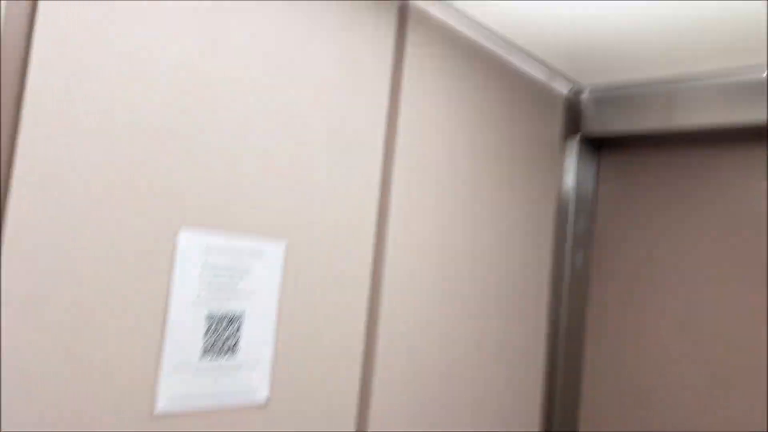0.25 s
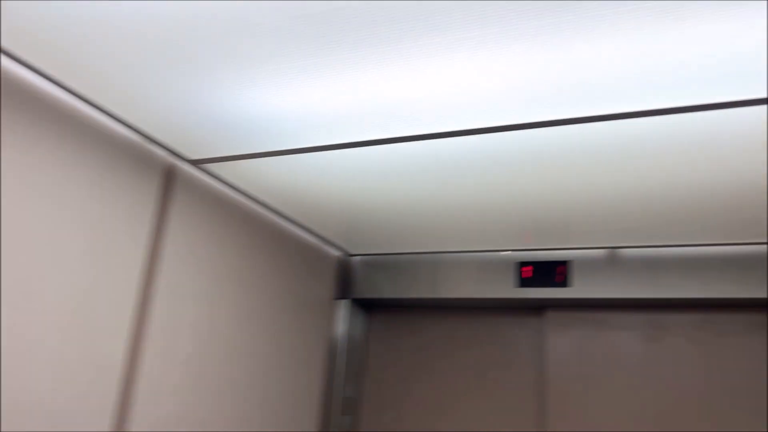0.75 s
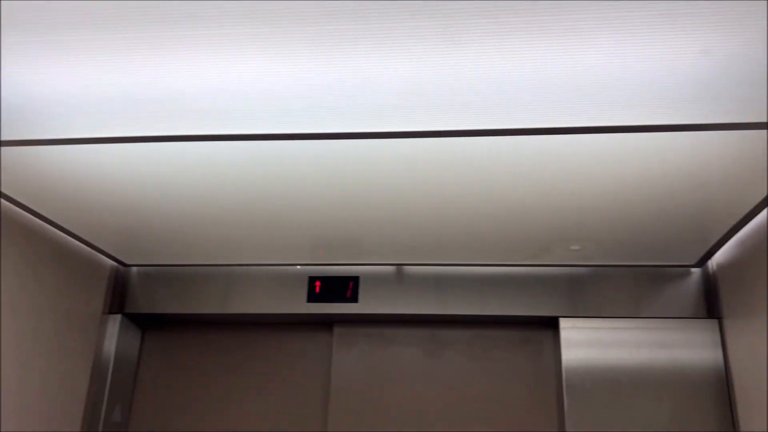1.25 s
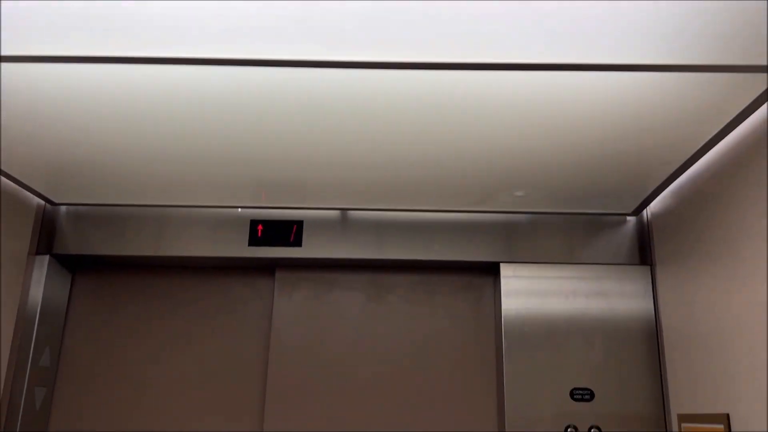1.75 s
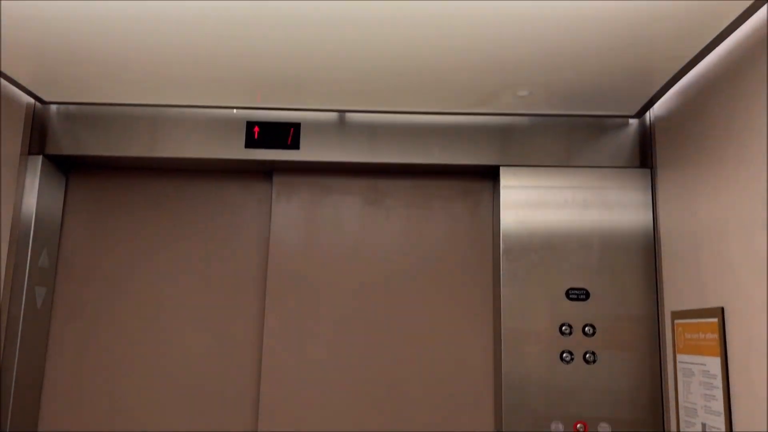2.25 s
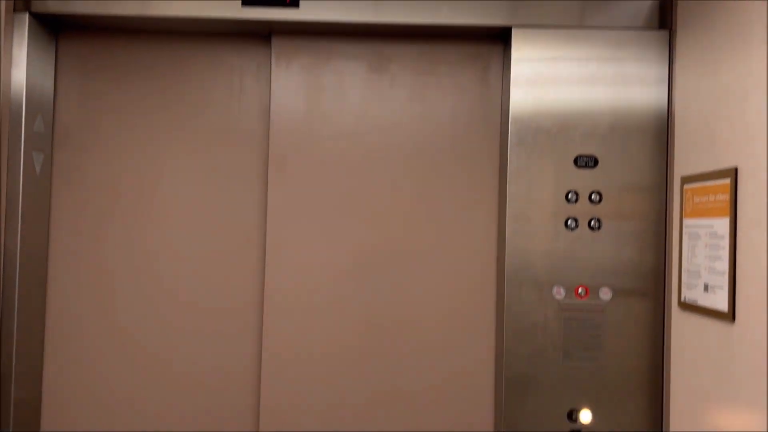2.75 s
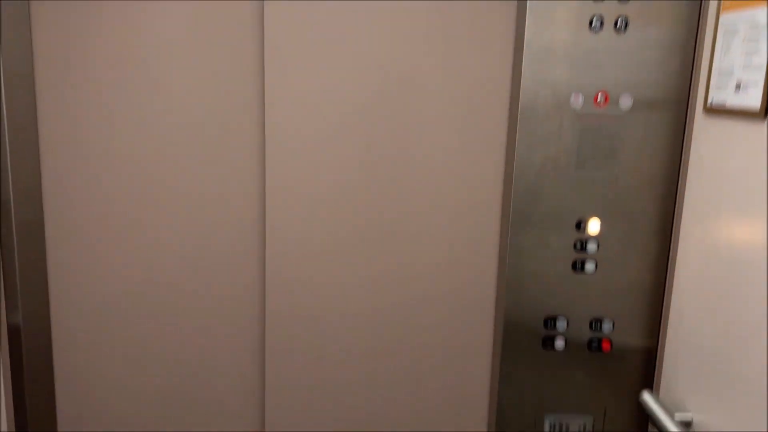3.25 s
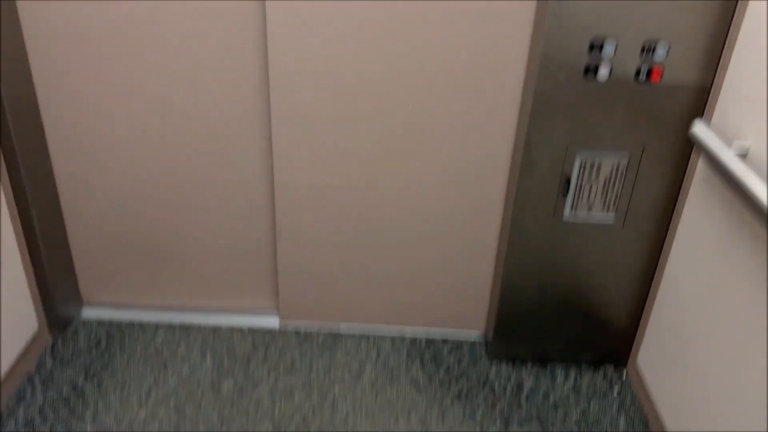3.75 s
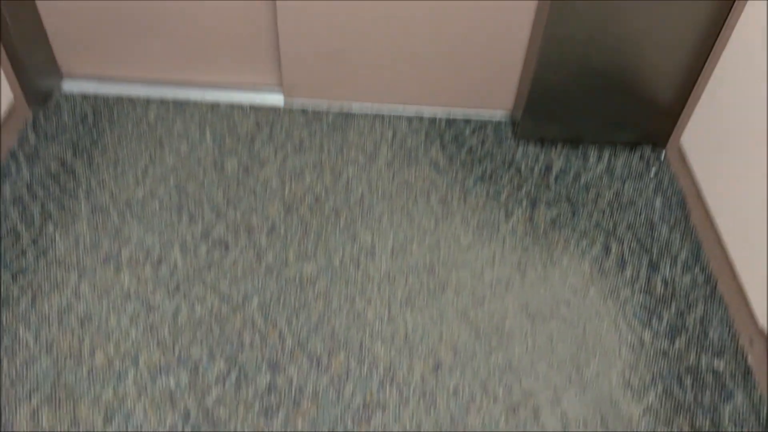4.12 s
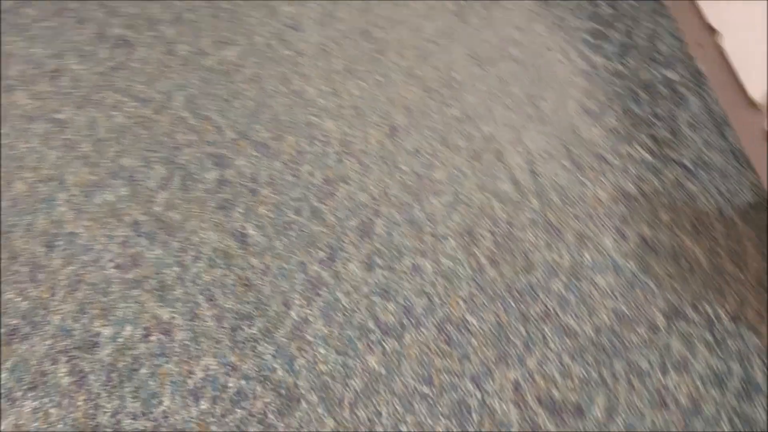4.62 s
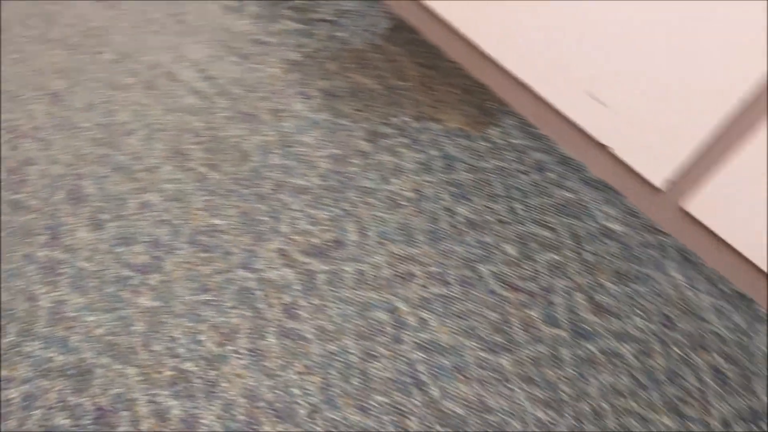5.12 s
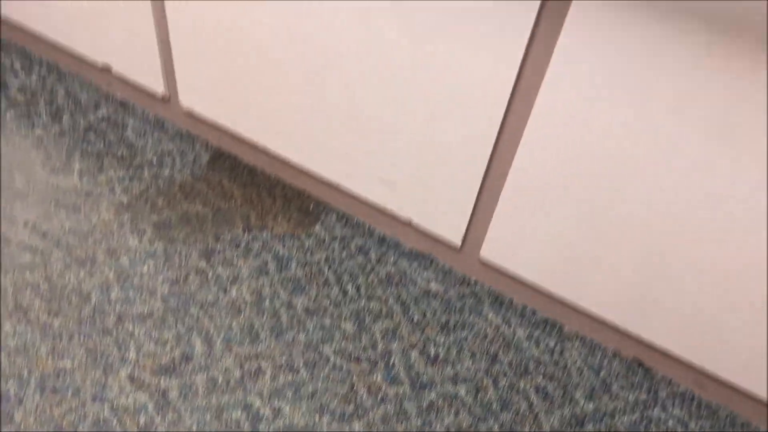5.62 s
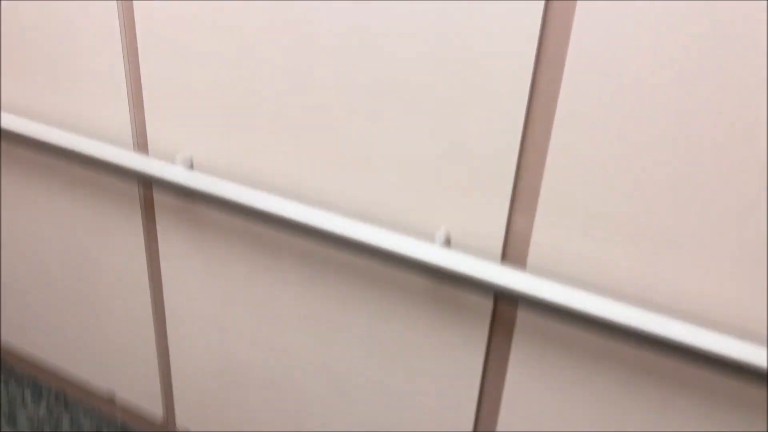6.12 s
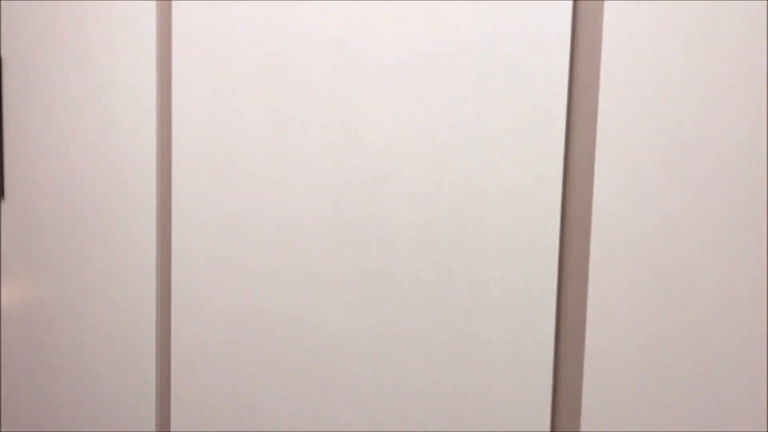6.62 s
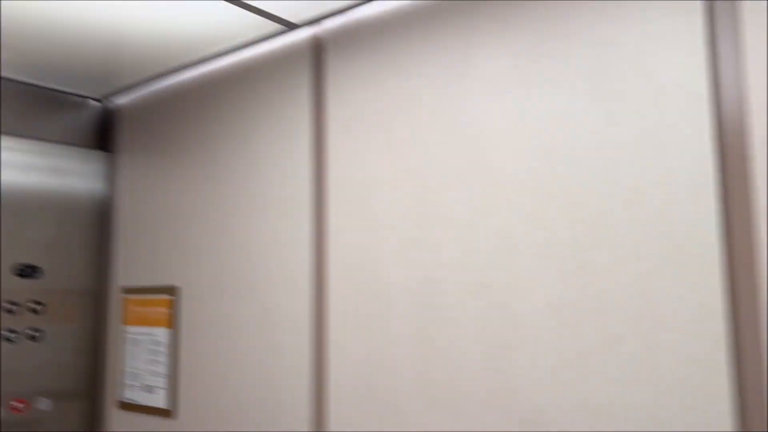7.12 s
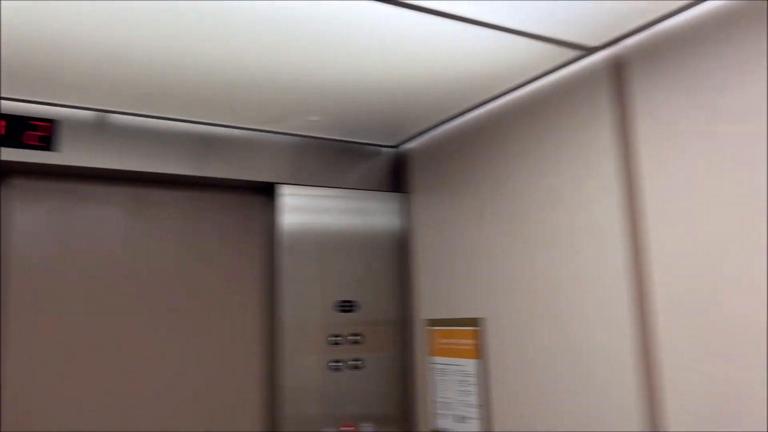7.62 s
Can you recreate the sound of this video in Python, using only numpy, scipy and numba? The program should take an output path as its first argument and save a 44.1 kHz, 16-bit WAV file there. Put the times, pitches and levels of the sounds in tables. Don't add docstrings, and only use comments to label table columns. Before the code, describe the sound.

A deep, droning elevator hum wavers in a small closed car while keys chink lightly, a shoe scuffs carpet and fingers tap close to the microphone.

```python
import sys
import numpy as np
from scipy import signal
from scipy.io import wavfile
from scipy.ndimage import uniform_filter1d, map_coordinates
from numba import njit

SR = 44100
rng = np.random.default_rng(int(sys.argv[2]) if len(sys.argv) > 2 else 0)


def unload_wav(signal):
    wavfile.write(
        sys.argv[1],
        SR,
        np.round(np.clip(np.atleast_2d(signal).T, -1, 1) * 32767).astype(np.int16),
    )


def volts_from_db(level):
    exponent = np.asarray(level, float) / 20
    return 10 ** exponent


N = 347067

SHAFT_HZ, FAN_HZ, MAINS_HZ = 58.72, 74.9, 60

# t/s, 4th order level/dB, level/dB of its difference between the ports
RIPPLE_SWING = [(0, -37.5, -49), (.15, -44, -47), (.25, -34.5, -47.5), (.63, -36, -48.5), (.8, -52, -48),
                (1.1, -46.5, -45.5), (1.75, -40.5, -49.5), (2.6, -43, -56), (2.9, -50, -62),
                (3.25, -34.5, -55), (4.08, -33, -50.5), (4.23, -37, -56), (4.5, -29.5, -50),
                (5.35, -29.5, -48.5), (5.88, -42, -60.5), (6.6, -35, -54), (6.87, -48, -58),
                (7.87, -47, -51)]
# t/s, drone level/dB (weak at mid height), 3rd order level/dB, blade level/dB
FAN_SWING = [(0, -41.5, -41.5, -72), (.4, -44, -61, -76.5), (.85, -37.5, -43.5, -56.5),
             (1.5, -41.5, -49.5, -60.5), (2.0, -37, -48.5, -56.5), (2.35, -46, -58, -64.5),
             (2.72, -36, -51.5, -56.5), (3.1, -45.5, -58.5, -59.5), (3.5, -45, -55.5, -57.5),
             (4.1, -55.5, -52.5, -59), (4.35, -49, -49, -71.5), (5.3, -46.5, -48.5, -56),
             (5.7, -47, -61.5, -48.5), (6.55, -49, -46.5, -65), (6.9, -35.5, -47, -56),
             (7.2, -43.5, -49.5, -49.5), (7.5, -43.5, -53, -49.5), (7.87, -52, -53, -53.5)]
# t/s, wall-to-wall level/dB, floor-to-ceiling overtone level/dB
AIR_MODES = [(0, -53, -53), (.55, -46.5, -62), (.9, -56, -59), (1.3, -50, -50.5), (2.0, -47.5, -55),
             (2.6, -51.5, -52), (3.3, -44, -48.5), (3.85, -52, -53.5), (4.8, -51.5, -47.5),
             (5.65, -69, -56.5), (6.3, -49, -49), (6.65, -46.5, -57), (7.3, -51.5, -53), (7.87, -43, -54)]


@njit
def svf(x, hz, width):
    y, band, low = np.empty(len(x)), 0., 0.
    g, k = np.tan(np.pi * hz / SR), width / hz
    for i in range(len(x)):
        v = (band + g * (x[i] - low)) / (1 + g * (g + k))
        band = 2 * v - band
        low += 2 * g * v
        y[i] = k * v
    return y


def unit(x):
    return x / np.sqrt(np.mean(x ** 2))


def narrow_noise(x, hz, width_hz):
    once = svf(x, 1. * hz, 1. * width_hz)
    return unit(svf(once, 1. * hz, 1. * width_hz))


def curves(rows):
    s, *columns = np.transpose(rows)
    return [np.interp(np.arange(N) / SR, s, c) for c in columns]


def place(x, db, pan_db):
    return x * volts_from_db(db + np.multiply.outer([.5, -.5], pan_db + np.zeros(N)))


def ports(both, apart):
    return both + apart * np.array([[1], [-1]])


def stroke(s, length, db, rise_db_s, fall_db_s):
    t = np.arange(N) / SR
    early = np.clip(s - t, 0, None)
    late = np.clip(t - s - length, 0, None)
    return volts_from_db(db - rise_db_s * early - fall_db_s * late)


def walk(rate):
    k = int(SR / rate)
    steps = np.repeat(rng.standard_normal(N // k + 1), k)
    return 1.245 * uniform_filter1d(uniform_filter1d(steps, k), k)[:N]


def tone(hz, wander_hz, flutter_db, rough, width_hz, beside_hz=0, beside=0):
    turns = np.cumsum(hz + wander_hz * walk(2.993)) / SR + rng.random()
    ahead = (beside_hz - hz) * (np.arange(N) / SR - 5.09)
    line = np.sin(2 * np.pi * turns) + beside * np.sin(2 * np.pi * (turns + ahead))
    haze = narrow_noise(rng.standard_normal(N), hz, width_hz)
    return np.sqrt(2 - 2 * rough) * line * volts_from_db(flutter_db * walk(18)) + np.sqrt(rough) * haze


def wash(spectrum, swell_db, flicker_db, patchy_db, apart):
    # f/Hz, likeness 0-1
    likeness = [(40, .999), (65, .985), (120, .8), (250, .8), (520, .35), (1080, .04), (2220, .08),
                (4570, .1), (9410, .25)]
    hz, db = np.transpose(spectrum)
    like_hz, like = np.transpose(likeness)
    noise = rng.standard_normal((2, N))
    f, t, (mid, side) = signal.stft(noise, SR, nperseg=4096, noverlap=3584)
    pitch = np.log(f + 1)[:, None]
    like = np.interp(pitch, np.log(like_hz), like) ** apart
    mid, side = mid * np.sqrt(1 + like), side * np.sqrt(1 - like)
    chance = rng.standard_normal((4, 1200, 100))
    swell = map_coordinates(chance[0], [0 * t, 1.367 * t])
    flicker = map_coordinates(chance[1], np.broadcast_arrays(3 * pitch, 8 * t))
    grid = np.broadcast_arrays(f[:, None] / 22, 3.5 * t)
    patches = np.array([map_coordinates(c, grid, order=1) for c in chance[2:]])
    patches = patchy_db * (like * patches[0] + (1 - like) * patches)
    colour = np.interp(pitch, np.log(hz), db, left=-90, right=-90)
    gain = volts_from_db(colour + swell_db * swell + flicker_db * flicker + patches)
    stereo = np.array([mid + side, mid - side]) * gain
    return unit(signal.istft(stereo, SR, nperseg=4096, noverlap=3584)[1][:, :N])


def ring(hz, t60, length):
    t = np.arange(length) / SR
    decay = np.exp(-np.log(1000) * t / t60)
    return np.sin(2 * np.pi * hz * t) * decay * np.clip(t / .0012, 0, 1)


def add(out, sound, s, pan_db, lag):
    for channel, start in enumerate([int(s * SR), int(s * SR) + lag]):
        out[channel, start:start + len(sound)] += sound * volts_from_db(pan_db * (1.0 - channel))


def pump():
    # t/s, lead of the ports' difference over their sum/rad
    turn = [(0, 2), (.6, 1.5), (1.1, 0.6), (2.7, 1), (3.2, 1.7), (4.15, 1.6), (4.5, -1), (4.95, 1),
            (6.4, -1.8), (6.85, 2), (7.87, 0.5)]
    # t/s, level/dB
    eighth_swing = [(0, -70), (.8, -75), (.95, -59.5), (1.68, -59), (1.82, -73.5), (2.2, -58), (2.74, -67),
                    (2.84, -54.5), (3.55, -46), (3.75, -54), (3.97, -69.5), (4.18, -51), (4.65, -46),
                    (5.35, -52), (5.74, -62.5), (5.9, -50), (7.0, -64.5), (7.3, -58.5)]
    # t/s, level/dB
    frame_shake = [(0, -47), (.9, -41), (2.0, -48.5), (2.75, -41), (3.4, -52.5), (6.5, -53.5), (7.4, -55),
                   (7.87, -50)]
    fourth_db, apart_db = curves(RIPPLE_SWING)
    fourth = tone(4 * SHAFT_HZ, .2, 0.94, 0.0043, 6.3, 4 * MAINS_HZ, 0.11)
    lead = curves(turn)[0]
    quarter_early = np.roll(fourth, -round(SR / 16 / SHAFT_HZ))
    ahead = np.cos(lead) * fourth + np.sin(lead) * quarter_early
    ripple = ports(fourth * volts_from_db(fourth_db), ahead * volts_from_db(apart_db))

    eighth = tone(8 * SHAFT_HZ, 0.41, 0.24, 0.022, 9.1) * volts_from_db(curves(eighth_swing)[0])
    eighth_apart = tone(8 * SHAFT_HZ, .2, 1.2, 0.04, 6.5) * volts_from_db(-63.0)
    second = tone(2 * SHAFT_HZ, 0.43, 0.37, 0.31, 16.0) * volts_from_db(curves(AIR_MODES)[0] + 1.0)
    second_apart = tone(2 * SHAFT_HZ, .2, 1.3, .08, 8.) * stroke(2.2, 7, -54.5, 9, 9)
    shake = place(tone(.96 * SHAFT_HZ, 0.86, 1.4, 0.48, 20.0), curves(frame_shake)[0] + 0.25, 0)
    return ripple + ports(eighth, eighth_apart) + ports(second, second_apart) + shake


def fan():
    drone_db, third_db, blade_db = curves(FAN_SWING)
    drone = place(tone(FAN_HZ, 0.57, 0.98, 0.27, 26.0), drone_db + 0.58, 0)
    third = place(tone(3 * FAN_HZ, 0.3, 0.42, 0.13, 19.0), third_db, 1.4)
    blades = tone(5 * FAN_HZ, 0.597, 0.55, 0.13, 7.6) * volts_from_db(blade_db)
    blades_apart = tone(5 * FAN_HZ, 0.7, 1.5, .3, 8.) * volts_from_db(-70.5)
    buzz = place(tone(6 * MAINS_HZ, 0.3, 3.7, 0.2, 10.0), -64.5, -8.5)
    whine = sum(tone(hz, 1.5, 1.5, .1, 20.) for hz in (9365, 9835))
    whine = whine * stroke(3.9, 2.0, -97.5, 15, 15)
    return drone + third + ports(blades, blades_apart) + buzz + whine


def overtones():
    # f/Hz, start t/s, length/s, level/dB
    faint = [(589, 0.17, .7, -65.5), (590, 2.6, .8, -63.5), (449.4, 0.88, .6, -62), (452.5, 5.6, 1.07, -61),
             (258.7, 3.9, 2.7, -58.5), (310, 1.6, 0.3, -55), (329, .6, 0.73, -58.5)]
    out = 0
    for hz, s, length, db in faint:
        out = out + place(tone(hz, .5, 2.2, 0.27, 9.) * stroke(s, length, db, 30, 30), 0, 0.94)
    return out


def ticks():
    # t/s, peak level/dB, f/Hz, left minus right/dB
    nail_cracks = [(.917, -60, 8000, 10), (2.569, -68, 7000, 8), (4.996, -56, 6300, 2),
                   (4.253, -55, 5000, 4), (5.143, -54, 4000, 0.5), (6.4652, -45, 6500, 1),
                   (6.466, -39.5, 3750, -3), (6.4667, -42.5, 1700, -1), (6.519, -47, 4200, 0.5),
                   (6.5183, -34, 7600, -5.5), (6.5183, -48, 13000, 2), (6.5198, -45, 2120, 5),
                   (6.5425, -59, 6000, -2), (6.9565, -30.5, 8600, -1.5), (6.957, -35.5, 5300, 13),
                   (6.9572, -41, 3900, 8), (6.9569, -43, 12000, .5), (6.9569, -28.5, 15000, .5),
                   (6.9571, -44, 6200, .5), (6.9573, -43, 2800, 5), (6.9755, -49, 12500, -.5),
                   (7.0145, -54, 5000, 11), (7.0195, -59, 3970, 13), (7.0195, -56, 9000, 6),
                   (7.0255, -52, 4500, 6), (7.031, -58, 3500, 6), (7.0725, -57, 6000, 6),
                   (7.0302, -52, 6100, 15.5), (7.045, -45.5, 6900, 11), (7.089, -58.5, 5940, 22.5),
                   (7.0892, -49, 2800, 2), (7.089, -52, 4200, 6), (7.1092, -50, 6500, 12.5),
                   (7.1095, -43, 3000, 1.5), (7.1107, -38, 2700, 1.5), (7.1106, -49, 5500, .5),
                   (7.1119, -51, 4000, 16.5), (7.1118, -49, 8000, .5), (7.1133, -44, 2200, .5),
                   (7.113, -48, 5200, .5), (7.114, -47, 6500, 3.5), (7.1148, -51, 8500, .5),
                   (7.1166, -38, 6300, 3), (7.117, -41, 8500, .5), (7.1172, -40, 1850, 13),
                   (7.1174, -41, 3000, 13), (7.1173, -38, 4600, 4), (7.1185, -42, 3200, .5),
                   (7.117, -41, 15000, .5), (7.1171, -46, 12000, .5), (7.125, -50, 13500, .5),
                   (7.1248, -41, 8500, .5), (7.1252, -42, 5000, 5), (7.1253, -48, 2600, 4),
                   (7.395, -48, 3000, -8.5)]
    # t/s, peak level/dB, f/Hz, left minus right/dB
    finger_knocks = [(5.35, -39, 1000, -1), (6.4654, -31.5, 790, -7), (6.519, -26.5, 1160, -3),
                     (6.5428, -31, 1120, -3.5), (6.758, -34, 1050, -3.5), (6.9573, -40, 663, 5),
                     (6.9572, -47, 1500, 6), (7.0135, -42, 600, -1), (7.0169, -31.5, 590, 4.5),
                     (7.0205, -43, 560, 9), (7.046, -45, 900, 2), (7.049, -39, 640, 3),
                     (7.11, -45, 1500, -6), (7.1135, -41, 865, 10), (7.119, -26, 690, 4),
                     (7.1265, -40, 670, 5), (7.395, -44, 1190, -2)]
    out, t = np.zeros((2, N)), np.arange(1600) / SR - .002
    snap = np.diff(np.exp(-(t / .00002) ** 2), prepend=0)
    clack = np.sin(2 * np.pi * 2100 * t) * np.exp(-np.abs(t - .0004) / 0.00025)
    for s, db, hz, pan_db in nail_cracks:
        crack = np.cos(2 * np.pi * hz * t) * np.exp(-np.abs(t) * hz / 1.1)
        add(out, volts_from_db(db) * (crack + volts_from_db(-13.0) * clack), s - .002, pan_db, lag=int(pan_db))
        add(out, volts_from_db(db - 9.0) * snap, s - .002, 0.62 * pan_db, lag=int(pan_db))
    for s, db, hz, pan_db in finger_knocks:
        cycles = np.clip(t * hz + 0.42, 0, None)
        thump = cycles * np.exp(1 - cycles / 0.56)
        casing = volts_from_db(-20) * np.exp(-cycles / 2.7)
        knock = volts_from_db(db) * np.sin(2 * np.pi * cycles) * (thump + casing)
        add(out, knock, s - .002, pan_db, lag=int(2 * pan_db))
    echo_t60_s = 0.084
    tail = rng.standard_normal((2, 9000)) * np.exp(-np.log(1000) * np.arange(9000) / SR / echo_t60_s)
    tail = uniform_filter1d(uniform_filter1d(tail, size=5, axis=1), size=4, axis=1)
    return out + volts_from_db(-31.5) * signal.fftconvolve(out, tail, axes=1)[:, :N]


def keys():
    # t/s, peak level/dB, left minus right/dB
    chinks = [
        (0.917, -61, 13),
        (1.8637, -63, 6),
        (1.92, -62, 8),
        (2.0007, -64, 7),
        (2.65, -50, 6),
        (2.793, -50, 5.5),
        (3.111, -51, 3),
        (3.41, -67, 15),
    ]
    modes_hz = (5500, 6050, 6230, 6700, 7000, 7300, 7750, 7850, 8310, 8570, 8970, 9100)
    scatter, t60_s = 0.013, 0.063
    out = np.zeros((2, N))
    for s, db, pan_db in chinks:
        for bounce in range(5):
            chance = rng.random((len(modes_hz), 3))
            sound = 0
            for hz, (a, b, c) in zip(modes_hz, chance):
                mode = ring(hz * (1 + scatter * (2 * b - 1)), t60_s * (0.66 + c), 8000)
                sound = sound + volts_from_db(-18 * a) * mode
            start = s + .009 * bounce * (1 + .3 * chance[0, 1])
            add(out, sound * volts_from_db(db - 15.5 - 2.1 * bounce), start, pan_db, lag=5)
    return out


def clothes():
    # t/s, level/dB
    restless = [(0, -68.5), (.6, -74), (1.2, -74.5), (2.6, -84.5), (3.4, -74.5), (4.9, -69), (5.3, -70),
                (6.1, -68.5), (7.87, -78)]
    # t/s, length/s, level/dB
    coat_rubs = [(0.292, 0.17, -75), (0.739, 0.049, -63), (0.907, 0.025, -84), (1.508, 0.042, -77.5),
                 (2.302, 0.055, -81.5), (3.445, 0.021, -79.5), (3.817, 0.19, -77.5), (4.297, 0.04, -73),
                 (5.021, 0.014, -78), (5.332, 0.011, -97), (5.498, 0.018, -73.5), (6.454, 0.025, -90),
                 (7.012, 0.082, -72), (7.385, 0.071, -69.5)]
    # t/s, length/s, level/dB, left minus right/dB
    sleeve_slides = [(0.005, 0.0053, -84, 4.5), (1.867, .02, -78.5, 7.5), (1.918, 0.024, -88, 4),
                     (2.005, .01, -91, 6), (2.657, .03, -69.5, 3.5), (2.793, 0.022, -83.5, 4),
                     (3.115, 0.032, -69.5, 3), (5.457, 0.018, -65, 2), (6.516, 0.045, -70.5, -10),
                     (6.592, 0.038, -69, -6), (6.758, 0.052, -70.5, -1), (7.202, 0.33, -80, 0),
                     (7.548, 0.36, -78, 2)]
    # f/Hz, level/dB per Hz
    cloth_spectrum = [(1200, -24), (2200, -5), (3200, -7), (4600, -8.5), (5400, -5.5), (6700, -2),
                      (7700, -8), (9260, -14), (9900, -25), (12800, -50)]
    rubs = volts_from_db(curves(restless)[0]) + sum(stroke(*row, 132, 94.5) for row in coat_rubs)
    rubs = place(rubs, 0, 6.5)
    slides = sum(place(stroke(*row, 1101, 91.5), 0, pan_db) for *row, pan_db in sleeve_slides)
    snaps = np.repeat(rng.exponential(size=N // 40 + 1), 40)[:N]
    snaps = volts_from_db(1.6 * uniform_filter1d(snaps, size=40))
    sheen_spectrum = [(6500, -31), (7600, -5.0), (8400, -2.0), (9300, -7.5), (10500, -23.5)]
    sheen = wash(sheen_spectrum, .4, 0.96, 5.7, 1.2)
    hiss = wash(cloth_spectrum, 0.51, 1.0, 4.0, 1.0)
    bright = sheen * (volts_from_db(-16.5) * rubs + volts_from_db(-5.5) * slides)
    return (hiss * (rubs + slides) + bright) * unit(snaps)


def shoes():
    # t/s, length/s, level/dB, centre f/Hz, left minus right/dB
    scuffs = [(0.935, 0.069, -64, 2540, -4), (4.266, 0.027, -60.5, 2300, -2), (4.277, .025, -68, 6000, 2),
              (4.743, 0.0089, -64.5, 5770, 5.5), (4.76, 0.036, -63.5, 2400, 0),
              (4.888, 0.046, -60.5, 2500, -1), (4.96, 0.051, -64.5, 2400, -1), (4.9, .04, -75, 3630, 0),
              (5.047, 0.065, -59.5, 2320, -2), (5.052, .035, -69, 3700, 0), (5.045, .035, -63.5, 6200, 3.5),
              (5.505, 0.026, -58, 2400, -0.5), (6.625, .03, -70, 8200, -10)]
    out, t = 0, np.arange(N) / SR
    for s, length, db, hz, pan_db in scuffs:
        brush = np.array([narrow_noise(x, hz, 0.33 * hz) for x in rng.standard_normal((2, N))])
        out = out + place(brush * np.exp(-((t - s) / length) ** 2), db, pan_db)
    return out


def car():
    # f/Hz, level/dB per Hz
    rumble = [(12, -35.5), (24, -18.5), (40, -16), (52, -7), (94, -9.5), (178, -12), (229, -11.5),
              (300, -12), (364, -15.5), (700, -29.5), (910, -55.5)]
    # f/Hz, level/dB per Hz
    vent_air = [(300, -40), (420, -5.5), (600, -6), (860, -8.5), (1050, -11.5), (1350, -10.5), (1800, -16),
                (2500, -18.5), (2750, -27), (3900, -32.5), (6800, -44), (9000, -50.5), (10000, -65.5),
                (11000, -81)]
    boom_db = -45.27 + 0.0297 * (curves(RIPPLE_SWING)[0] + 42)
    rush_db = -55.5 + 0.022 * (curves(FAN_SWING)[0] + 44.0)
    boom = wash(rumble, 0.16, 0.44, 4.9, 0.94) * volts_from_db(boom_db)
    mode = place(tone(146., 1.9, 2.0, 0.93, 22.0), curves(AIR_MODES)[1] + 0.15, .6)
    sway = place(tone(32., 0.92, 1.4, 1.0, 6.5), -57.5, 0)
    rush = place(wash(vent_air, .7, .9, 3.6, 1), rush_db, 1.0)
    return boom + mode + sway + rush


def scene():
    return pump() + fan() + overtones() + ticks() + keys() + clothes() + shoes() + car()


def top_cut(x):
    return signal.sosfilt(signal.butter(12, 15720, fs=SR, output="sos"), x)


def record(dry):
    low_pass = signal.butter(3, 9800, fs=SR, output="sos")
    start = dry[:, :1]
    dull = signal.sosfilt(low_pass, dry - start) + start
    hiss = volts_from_db(-88) * rng.standard_normal(dry.shape)
    return top_cut(dull + volts_from_db(-27.5) * dry + hiss)


dry = scene()
out = record(dry)
unload_wav(out)
```